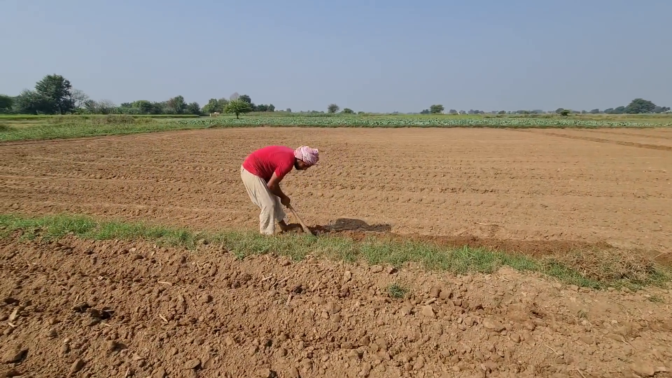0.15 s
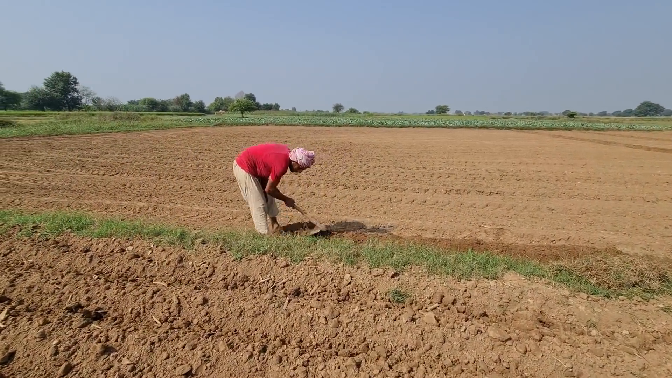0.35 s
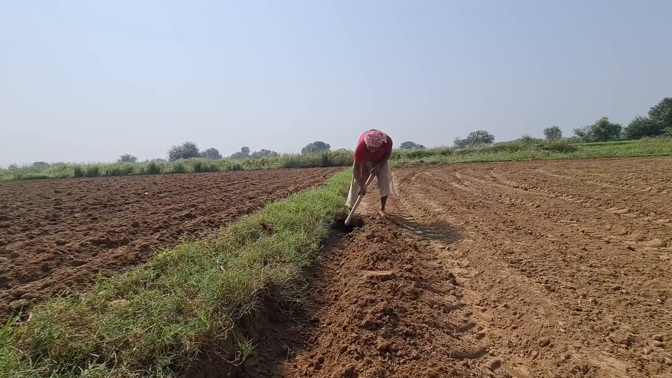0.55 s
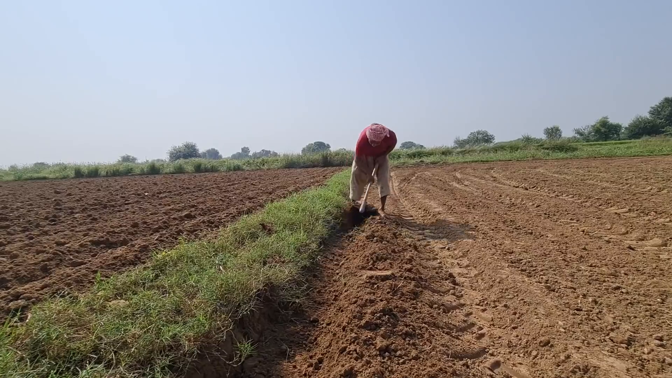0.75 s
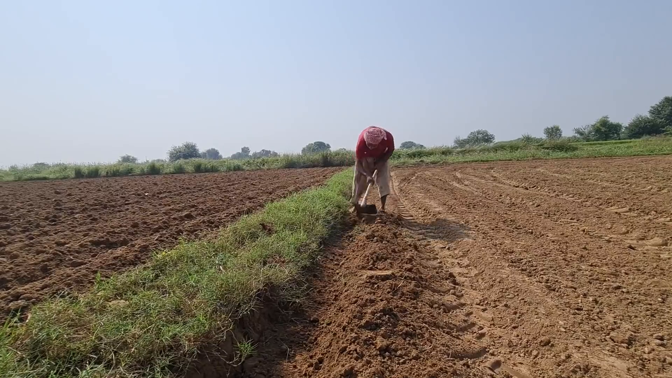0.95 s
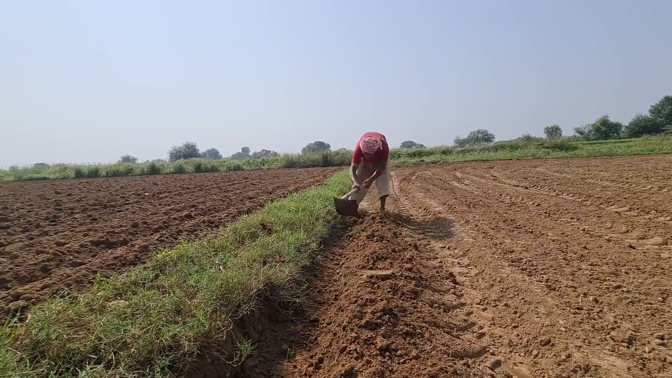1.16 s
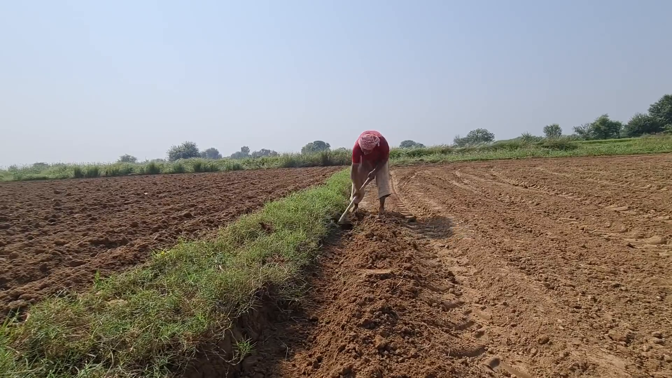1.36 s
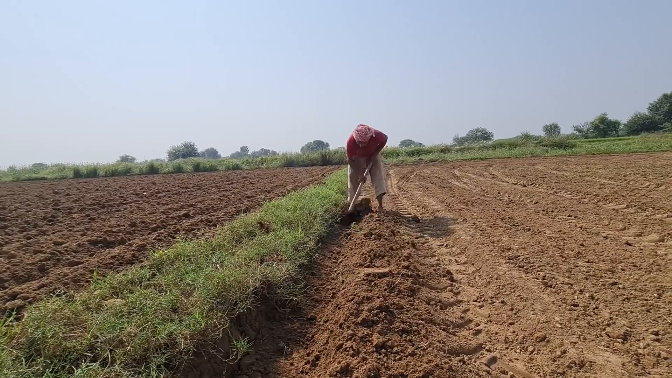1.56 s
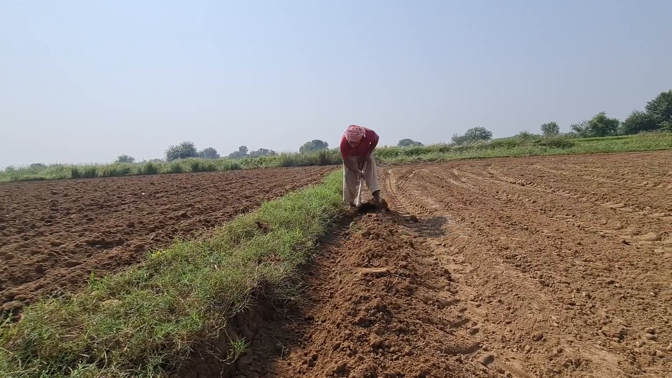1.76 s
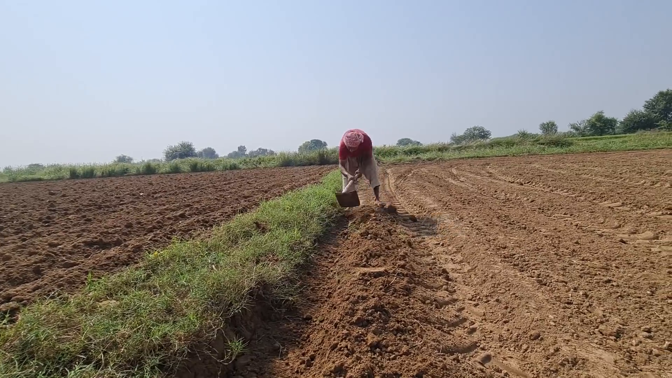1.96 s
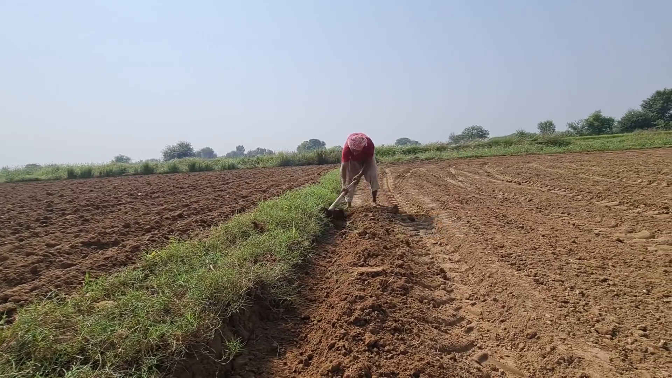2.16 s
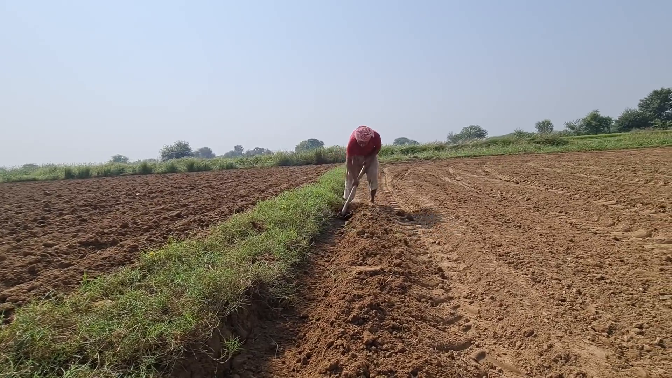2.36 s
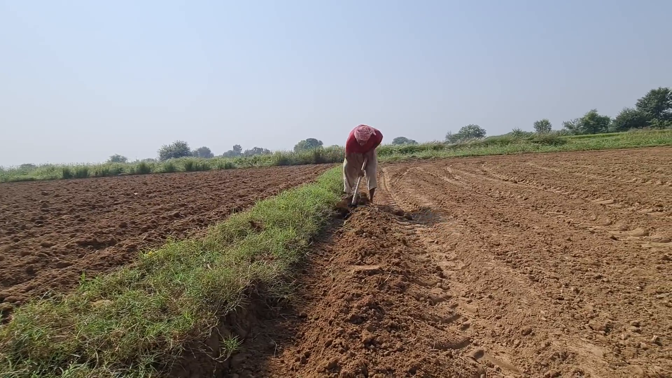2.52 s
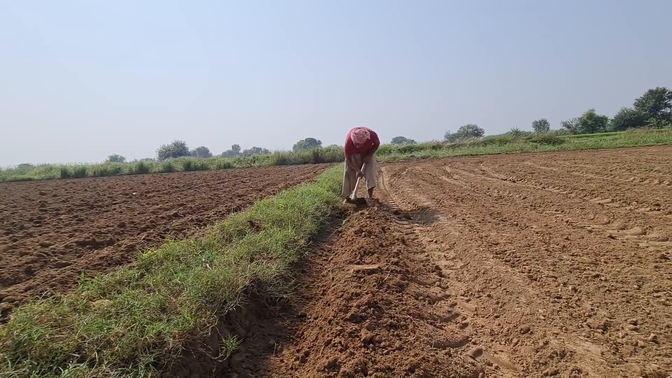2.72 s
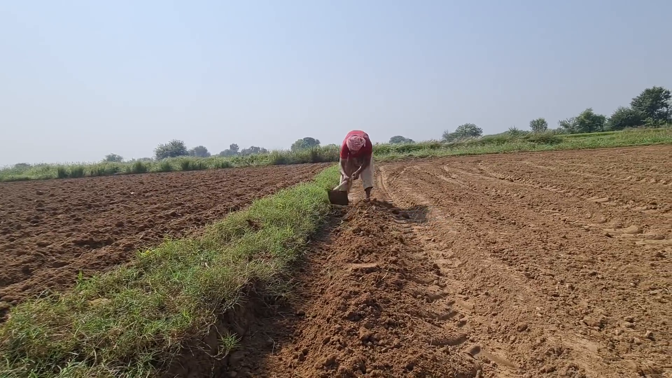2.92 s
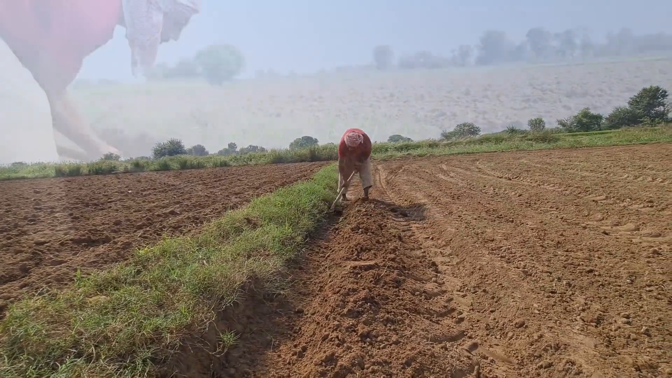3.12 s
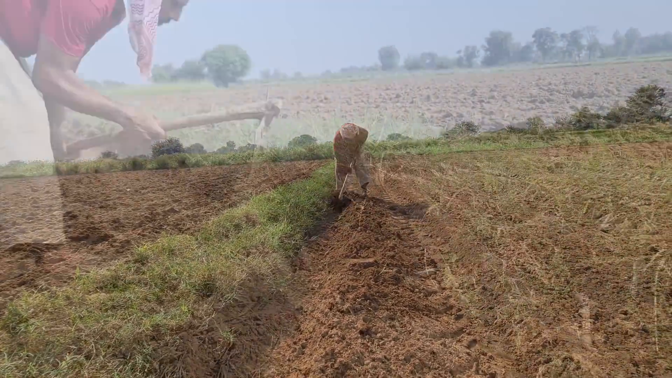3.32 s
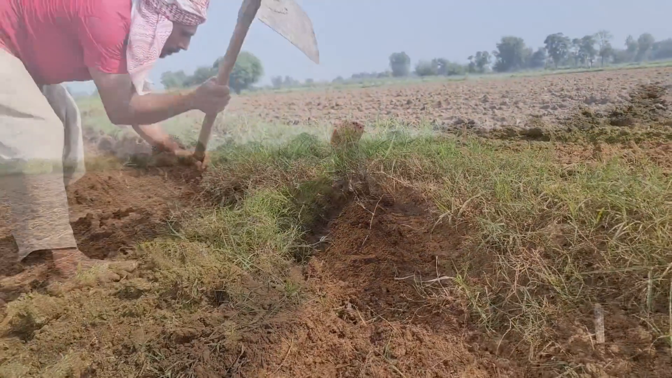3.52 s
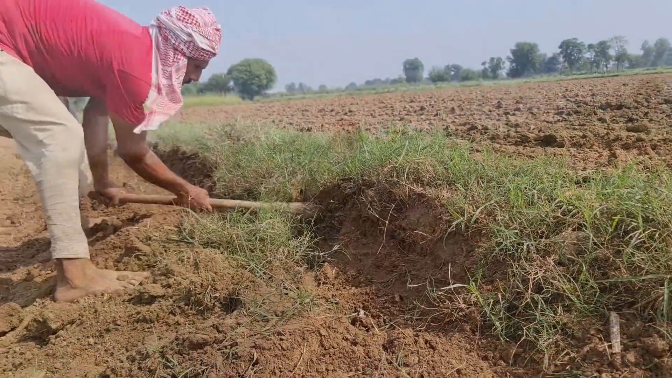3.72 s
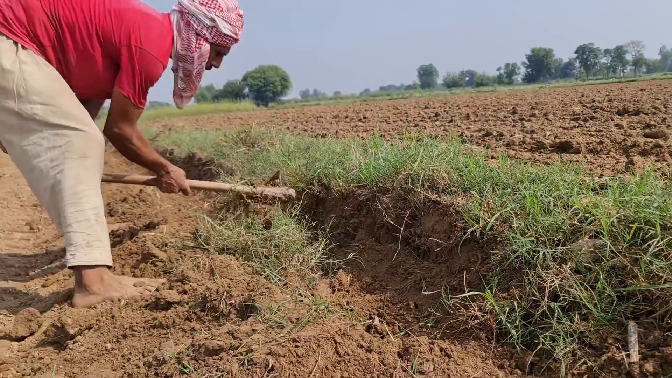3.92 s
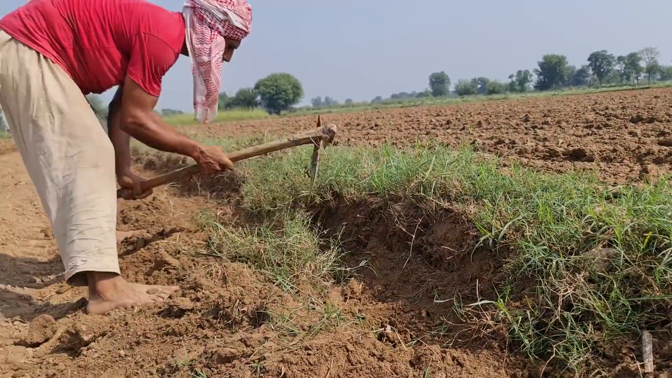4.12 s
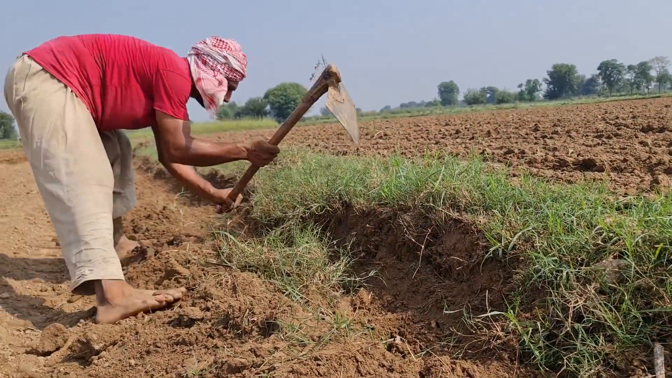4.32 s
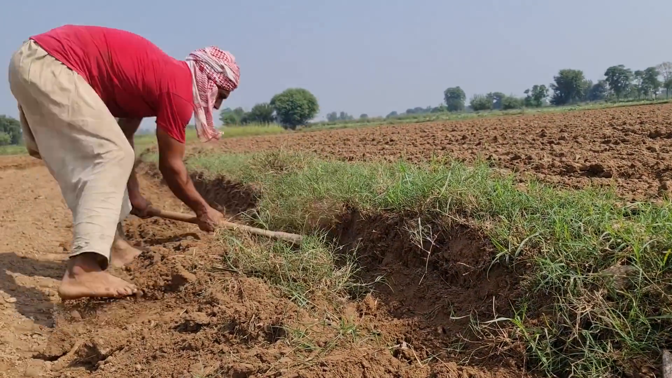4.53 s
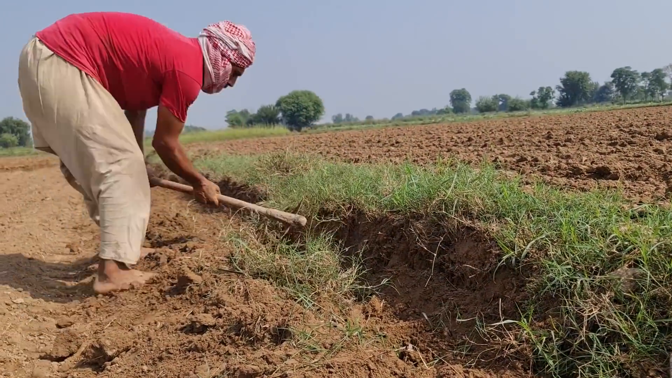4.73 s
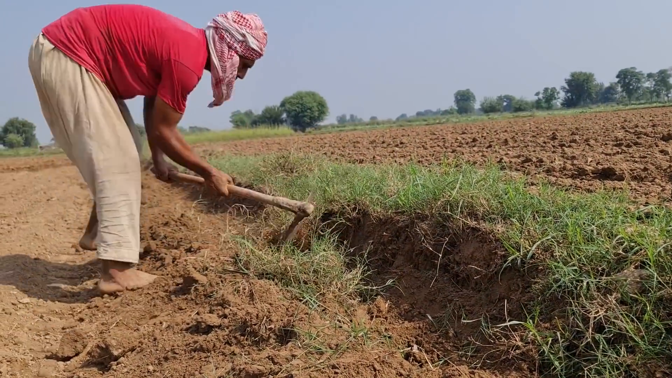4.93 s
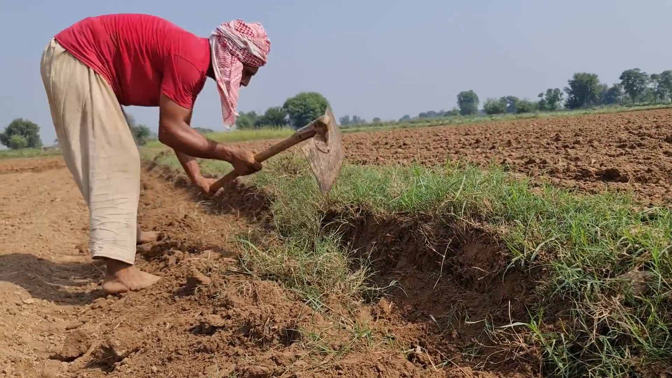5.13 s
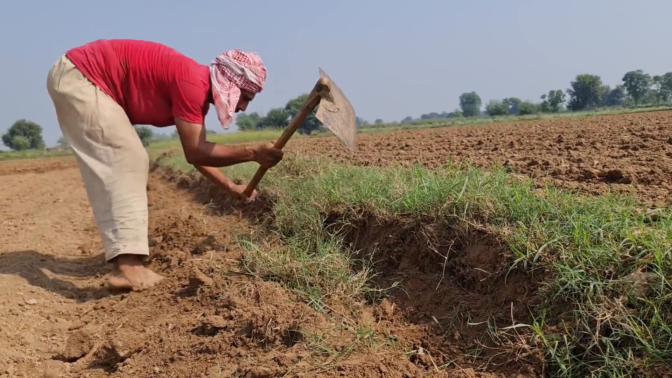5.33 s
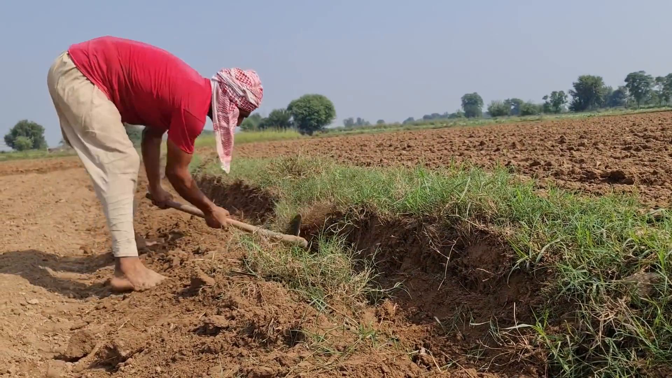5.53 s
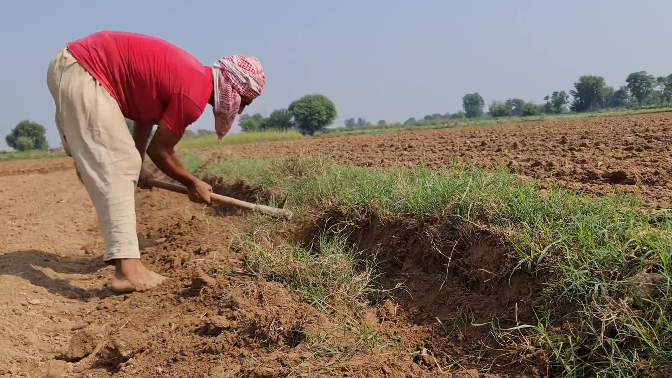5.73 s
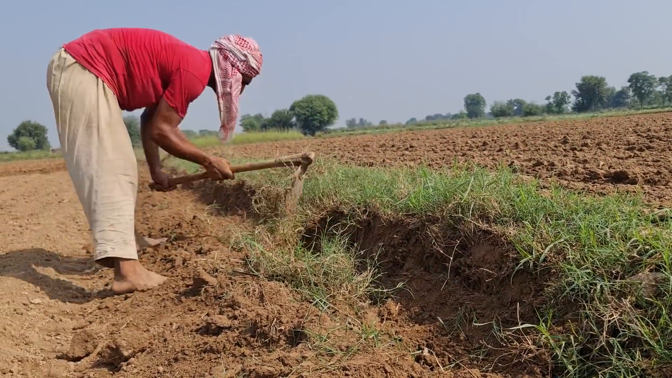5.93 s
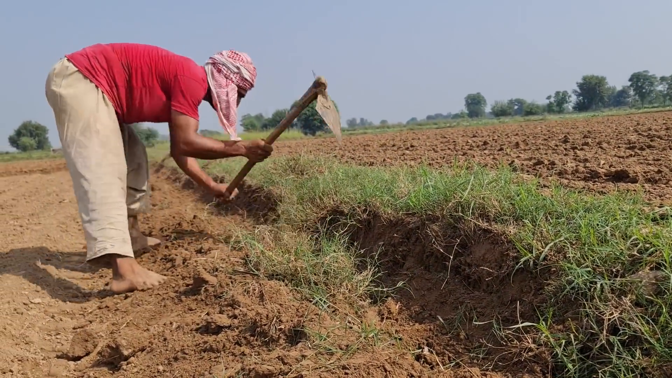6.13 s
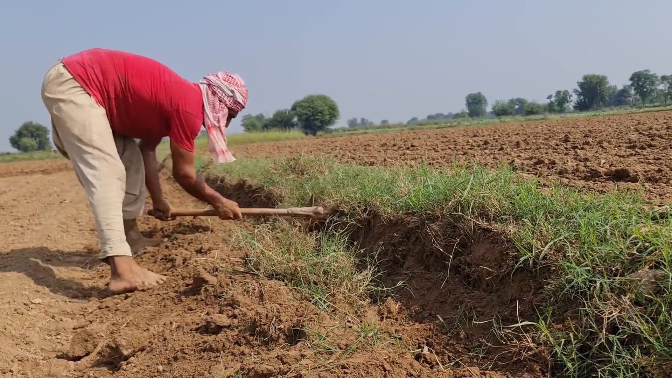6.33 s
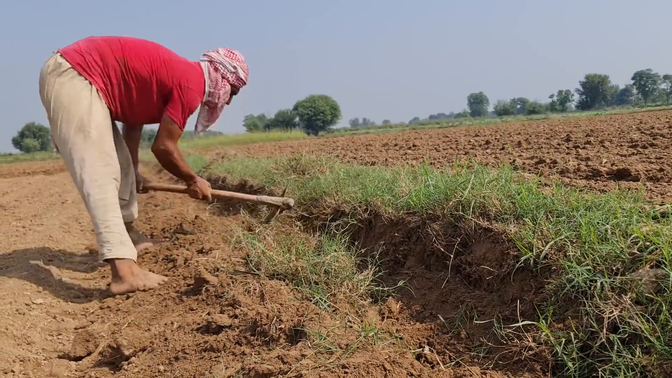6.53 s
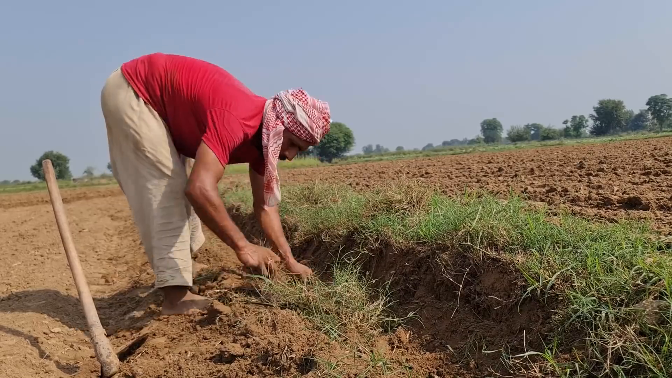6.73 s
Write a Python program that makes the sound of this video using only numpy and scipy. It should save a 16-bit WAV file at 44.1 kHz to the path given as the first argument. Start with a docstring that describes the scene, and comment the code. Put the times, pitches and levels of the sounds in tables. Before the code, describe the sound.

Stereo hand-held outdoor pickup of digging, leaning slightly right and completely dry. Four thin, grassy hoe cuts come from some way off, each with a crisp snap. After them come four close strokes, fuller and harder, with gritty crunch, dull metallic clank, earthy thud and cracking roots. Crumbs trickle and clods patter afterwards. A tiny bird note sounds once late on; a soft deep rumble continues underneath.

```python
"""Open field: a short hoe chops dry, grassy soil, four strokes some way off, then four close by.
Blade strokes are shaped noise: stems tear, grit crunches, the steel rings and the ground thuds.
Bursts of noise make snapping stalks and roots and landing clods; grains of noise make loose soil.
Underneath lie a low rumble and faint air of filtered noise; a bird's two gliding sines sound once."""
import sys
import numpy as np
from scipy import signal
from scipy.fft import rfft, irfft, next_fast_len
from scipy.io import wavfile

SR = 44100
rng = np.random.default_rng(int(sys.argv[2]) if len(sys.argv) > 2 else 0)


def inscribe(sig):
    """Save sig as 16-bit PCM at rate SR to the path in sys.argv[1].

    A 1-D sig is mono; a 2-D sig holds one channel per row.
    Samples are clipped to [-1, 1] before scaling.
    """
    pcm = np.round(np.clip(np.atleast_2d(sig).T, -1, 1) * 32767)
    wavfile.write(sys.argv[1], SR, pcm.astype(np.int16))


N = 302967
TIME_S = np.arange(N) / SR

# All table levels are relative: layer gains and filters follow.
# Hoe strokes; each layer scales swell_db and t60_s:
# bite_s, cutting_s (before the bite), swell_db, t60_s, grass_db, grit_db, ring_db, thud_db, root_snap_db
CHOPS = [ (0.5402, .021, 11.5, 0.2, -44, -58, -61, -45, -28),
         (1.443, 0.035, 4, 0.2, -50, -59, -62, -52.5, -46),
         (2.308, 0.066, 8.5, .24, -49.5, -60, -67, -50.5, -62),
         (3.1938, 0.039, 14, .25, -50, -62, -61.5, -50, -38),
         (3.7614, 0.015, 18, .11, -42, -27.5, -23.5, -37, -25.5),
         (4.560, 0.029, 8, .14, -42.5, -32, -30, -37.5, -34),
         (5.554, .027, 20.5, 0.17, -40.5, -33, -31, -45.5, -29),
         (6.368, 0.029, 15.5, .16, -65, -33.5, -38.5, -43.5, -47)]
# Clods and small stones landing: start_s, level_db, t60_s, dull_above_hz, hop_db (re first landing)
CLODS = [ (0.090, -58.5, 0.046, 1100, -16), (0.44, -49.5, .008, 4400, -30), (0.994, -45, 0.029, 680, -12),
         (3.012, -49, .06, 3600, -14), (3.270, -54, 0.036, 3100, -20), (4.732, -36.5, 0.029, 6440, -17),
         (4.850, -57.5, 0.056, 500, -13), (5.678, -59, .018, 4900, -20), (5.715, -48, 0.028, 7000, -17),
         (6.414, -39, .018, 5000, -8), (6.456, -41, 0.028, 2180, -3.5), (6.467, -45.5, 0.021, 4500, -25),
         (6.738, -55, .02, 7000, -2)]
# Loose soil sliding as the blade is drawn back: middle_s, level_db
SLIDES = [(0.387, -70), (0.948, -65.5), (1.826, -63.5), (2.745, -67), (3.621, -68.5), (4.83, -64.5),
          (5.984, -64.5)]
# Loose soil spilling over the ground: middle_s, half_length_s, level_db
SPILLS = [(0.01, .025, -63.5), (3.028, 0.022, -58.5), (4.003, 0.036, -73), (4.775, 0.011, -60)]
# Bent stalks springing back: start_s
SPRING_STARTS = [0.496, 0.684, 0.722, 4.393, 6.761]
# Bird notes: middle_s, top_pitch_hz, level_db
BIRD_NOTES = [(5.335, 3270, -66.5), (5.368, 3180, -68)]
# Resonances of blade and handle, damped by the soil: pitch_hz, width_hz, level_db
HOE_MODES = [(352, 48, -5.5), (480, 61, -1), (589, 48, 1), (733.4, 52, 8), (881, 55, 2.5), (1084, 50, -2),
             (1289, 90, 0.5), (1477, 90, 3), (1887, 94, -2), (2010, 74, -7.5), (2210, 42, -11.5),
             (3040, 140, -15.5), (3630, 61, -4.5), (3860, 34, -17.5)]
# Narrow treble colours of strokes and slides, as heard at the hand-held microphone:
# pitch_hz, width_hz, level_db
TREBLE_COLOURS = [(3564, 51, -4), (4140, 187, -1.5), (5270, 77, 1), (5940, 100, 4.5), (6450, 163, 3),
                  (7050, 48, 3.5), (7680, 112.7, -15.5), (8260, 76, -6.5)]
# Spectrum of stems and stalks: pitch_hz, level_db (per Hz)
GRASS_SPECTRUM = [(500, -59.5), (2300, -10), (3200, -7.5), (4500, -2), (5700, 1), (6700, 1), (7300, -2),
                  (8300, -18.5), (10500, -16.5), (16000, -21.5)]
# Spectrum of crunching grit: pitch_hz, level_db (per Hz)
GRIT_SPECTRUM = [(120, -7), (350, -17.5), (1000, -4), (1500, 0.5), (2500, -4), (3200, -0.5), (4500, -4),
                 (7000, -2.5), (7700, -9), (9200, -17), (16000, -15.5)]
# Spectrum of the ground's thud: pitch_hz, level_db (per Hz)
THUD_SPECTRUM = [(40, -30), (100, 0.5), (150, 3), (205, 1), (270, -2), (360, -3.5), (520, -14), (1000, -18),
                 (3000, -48)]
# Spectrum of shattering clods: pitch_hz, level_db (per Hz)
CLOD_SPECTRUM = [(80, -17), (200, -6), (420, 2.5), (600, -6.5), (900, -3.5), (1500, -2), (2500, -8),
                 (3500, -6), (7000, -5), (9000, -18.5), (16000, -12.5)]
# Spectrum of the low rumble: pitch_hz, level_db (per Hz)
RUMBLE_SPECTRUM = [(11, -49.5), (18, -35.5), (21, -36.5), (41, -6), (70, 0), (85, -3), (129, -16.5),
                   (151, -24), (184, -29), (209, -33.5), (293, -44.5), (400, -57), (520, -64.5),
                   (880, -120)]
# Spectrum of the field air: pitch_hz, level_db (per Hz)
AIR_SPECTRUM = [(200, -6.5), (350, 0.5), (550, -5), (750, -4.5), (980, -11), (1300, -1), (1580, 0.5),
                (2050, -9), (3000, -10.5), (5300, -14), (7100, -8), (7800, -13.5), (9300, -39),
                (12500, -18), (15000, -16.5)]
# Response of the left microphone port: pitch_hz, level_db
LEFT_PORT = [(3000, 0), (5400, 0), (6100, -2), (6700, -3.5), (7750, 4.5), (8300, 1.5), (9500, -2),
             (13000, -1)]
# Response of the right microphone port: pitch_hz, level_db
RIGHT_PORT = [(3000, 0), (4800, 0), (6000, 0), (6900, 2), (7500, -4.5), (8300, 0), (10000, 1.5), (13000, 0)]

RUMBLE_DB, AIR_DB = -50, -72
NOTE_HALF_S, NOTE_SAG_HZ = 0.0077, 30
SLIDE_HALF_S, SPILL_DULL_HZ = 0.049, 3240
# Clod broken off by each stroke: delay after the bite, level re grit, decay, treble limit, hop re landing
BREAK_AFTER_S, BREAK_DB, BREAK_T60_S, BREAK_DULL_HZ, BREAK_HOP_DB = 0.023, -2.5, 0.019, 2200, -14.5
HOP_S = 0.019           # from landing to second landing
SNAP_HZ, SNAP_WIDTH_HZ, SNAP_T60_S = 6480, 700, 0.013
FIRST_STALK_DB = -6     # re grass level of the stroke
SPRING_DB = -60
# Short reflection at the microphone: lags (left, right) during far and close strokes, level
FAR_LAGS_S, CLOSE_LAGS_S, REFLECTION_DB = (0.0025, 0.00169), (0.00141, 0.0021), -13
CLOSE_FROM_S = 3.55     # listener beside the hoe from here on
CUTOFF_HZ = 15900


def from_db(db):
    """Decibels to gain."""
    return 10 ** (np.asarray(db) / 20)


def rms_one(x):
    """Scale to unit power."""
    return x / np.sqrt(np.mean(x ** 2) + 1e-20)


def colour(x, spectrum):
    """Causal minimum-phase filter that follows a spectrum and keeps the power of white noise."""
    size = next_fast_len(N + SR // 2, True) // 2 * 2
    hz, db = np.transpose(sorted(spectrum))
    grid_hz = np.maximum(np.arange(size // 2 + 1) * SR / size, 1)
    gain = rms_one(from_db(np.interp(np.log(grid_hz), np.log(hz), db)))
    cepstrum = irfft(np.log(gain))
    # fold the cepstrum onto positive time: minimum phase
    cepstrum[1:size // 2] *= 2
    cepstrum[size // 2 + 1:] = 0
    return irfft(rfft(x, size) * np.exp(rfft(cepstrum)))[..., :N]


def dulled(x, hz):
    """Soft soil swallows the treble: second-order low-pass."""
    low_pass = signal.butter(2, min(hz, SR / 3), fs=SR, output="sos")
    return signal.sosfilt(low_pass, x)


def resonate(drive, modes):
    """Parallel two-pole resonances; keeps the power of white noise."""
    out, power = 0, 0
    for k, (hz, width_hz, db) in enumerate(modes):
        r = np.exp(-np.pi * width_hz / SR)
        zeros = np.array([1, 0, -1]) * (1 - r * r) / 2
        poles = [1, -2 * r * np.cos(2 * np.pi * hz / SR), r * r]
        mode = signal.lfilter(zeros, poles, drive)
        out = out + (-1) ** k * from_db(db) * mode
        power += from_db(db) ** 2 * (1 - r)
    return out / np.sqrt(power)


def pan(x, right_db):
    """Level difference that leans a sound to the right."""
    return x * from_db(right_db * np.array([[-0.5], [0.5]]))


def noise(likeness):
    """White noise in two partly alike channels."""
    mid, side = rng.standard_normal((2, N))
    alike = np.clip(likeness, -1, 1)
    signs = np.array([[1], [-1]])
    return np.sqrt((1 + alike) / 2) * mid + np.sqrt((1 - alike) / 2) * side * signs


def grains(per_s, spread_db, likeness):
    """Tiny fractures of uneven size at random moments, in both channels."""
    born = rng.random(N) < per_s / SR
    sizes = from_db(spread_db * np.minimum(rng.exponential(1, N), 4))
    return rms_one(born * sizes * noise(likeness))


def crumbling(depth_db, clump_s):
    """Soil gives way in fits: gain wanders between random values clump_s x 0.5 to 2 apart."""
    knots_s = np.cumsum(rng.uniform(0.5, 2, N // 20)) * max(clump_s, 0.001)
    fits = np.interp(TIME_S, knots_s, rng.uniform(-1.25, 1, len(knots_s)))
    return rms_one(from_db(depth_db * fits))


def crunch(drive, spectrum, depth_db, clump_s):
    """Three coarser bands each come in fits of their own; the finest remainder does not."""
    rest, out = colour(drive, spectrum), 0
    for hz in (1600, 3600, 7600):
        low_pass = signal.butter(2, hz, fs=SR, output="sos")
        coarser = signal.sosfiltfilt(low_pass, rest)
        out = out + coarser * crumbling(depth_db, clump_s)
        rest = rest - coarser
    return out + rest


def treble_grains(per_s, spread_db):
    """Narrow treble colours as heard at the hand-held microphone; each has its own train of grains."""
    out = 0
    for hz, width_hz, db in TREBLE_COLOURS:
        train = grains(per_s, spread_db, likeness=0.37)
        out = out + from_db(db) * resonate(train, [(hz, width_hz, 0)])
    return rms_one(out)


def burst(s, db, t60_s):
    """Sudden start, exponential decay."""
    return (TIME_S >= s) * from_db(db - 60 * np.clip((TIME_S - s) / t60_s, 0, 3))


def swell(s, half_s):
    """Gaussian rise and fall about one moment."""
    return np.exp(-0.5 * np.minimum(((TIME_S - s) / half_s) ** 2, 100))


def stroke_force(levels_db, late_s, hold_s, steeper, fade_scale, touch_db=30):
    """Each stroke swells from first touch to deepest bite, holds briefly and dies as the blade stops."""
    out = np.zeros(N)
    for (bite_s, cutting_s, swell_db, t60_s, *_), level_db in zip(CHOPS, levels_db):
        t = TIME_S - bite_s - late_s
        rise_db = steeper * swell_db * np.minimum(t, 0) / cutting_s
        first_touch_db = touch_db * np.minimum(t / cutting_s + 1, 0)  # slow strokes brush in slowly
        fade_db = -60 * np.maximum(t - hold_s, 0) / (t60_s * fade_scale)
        out += from_db(np.maximum(level_db + rise_db + first_touch_db + fade_db, -200))
    return out


def field():
    """Rumble reaches both ears nearly alike; faint air is diffuse."""
    rumble = from_db(RUMBLE_DB) * colour(noise(likeness=0.93), RUMBLE_SPECTRUM)
    air = from_db(AIR_DB) * colour(noise(likeness=0.0069), AIR_SPECTRUM)
    return pan(rumble, right_db=2.2) + air


def bird():
    """Thin, far whistle of two short notes, each a small arch in pitch."""
    out = 0
    for s, top_hz, db in BIRD_NOTES:
        hz = top_hz - NOTE_SAG_HZ * np.minimum(((TIME_S - s) / NOTE_HALF_S) ** 2, 9)
        whistle = np.sin(2 * np.pi * np.cumsum(hz) / SR)
        out = out + from_db(db) * swell(s, NOTE_HALF_S) * whistle
    return out


def loose_soil():
    """Crumbs trickle after each stroke, spill now and then, and slide as the blade is drawn back."""
    trickle = sum(burst(s, grit_db - 33, t60_s=1.1) for s, _, _, _, _, grit_db, *_ in CHOPS)
    spill = sum(from_db(db) * swell(s, half_s) for s, half_s, db in SPILLS)
    slide = sum(from_db(db) * swell(s, SLIDE_HALF_S) for s, db in SLIDES)
    crumb_grains = grains(per_s=3600, spread_db=0.5, likeness=0.39)
    crumbs = crunch(crumb_grains, GRIT_SPECTRUM, depth_db=7.0, clump_s=0.0079)
    on_blade = resonate(grains(per_s=400, spread_db=3.5, likeness=0.4), HOE_MODES)
    rustle = colour(grains(per_s=3000, spread_db=2.0, likeness=0.5), GRASS_SPECTRUM)
    treble = treble_grains(per_s=250, spread_db=2.5)
    trickling = trickle * (crumbs + from_db(-6.5) * on_blade)
    spilling = spill * (dulled(crumbs, SPILL_DULL_HZ) + from_db(-5) * on_blade)
    sliding = slide * (from_db(-9) * rustle + from_db(-5.5) * treble + from_db(-17.5) * on_blade)
    return trickling + spilling + sliding


def clods():
    """A clod shatters as it lands, hops once and jars the blade; each has its own treble limit."""
    broken_off = [(s + BREAK_AFTER_S, grit_db + BREAK_DB, BREAK_T60_S, BREAK_DULL_HZ, BREAK_HOP_DB)
                  for s, _, _, _, _, grit_db, *_ in CHOPS]
    shatter, knocks = noise(likeness=0.54), 0
    for s, db, t60_s, dull_hz, hop_db in [*broken_off, *CLODS]:
        landings = burst(s, db, t60_s) + burst(s + HOP_S, db + hop_db, t60_s)
        makeup = (1 + 4000 / dull_hz) ** 0.5  # dull knocks pack their energy into a narrow band
        knocks = knocks + makeup * dulled(landings * shatter, dull_hz)
    soil = from_db(1.0) * colour(knocks, CLOD_SPECTRUM)
    return soil + from_db(-15.5) * resonate(knocks, HOE_MODES)


def snaps():
    """A stalk cracks at first touch, a root at the deepest bite; bent stalks spring back at set moments."""
    force = sum(burst(s, SPRING_DB, SNAP_T60_S) for s in SPRING_STARTS)
    for s, cutting_s, _, _, grass_db, *_, root_db in CHOPS:
        stalk = burst(s - cutting_s, grass_db + FIRST_STALK_DB, SNAP_T60_S)
        root = burst(s, root_db, SNAP_T60_S)
        force = force + stalk + root
    cracks = colour(force * noise(likeness=0.59), GRASS_SPECTRUM)
    pitched = resonate(cracks, [(SNAP_HZ, SNAP_WIDTH_HZ, 0)])
    return from_db(-4.5) * cracks + from_db(-10.0) * pitched


def chops():
    """Stems tear, grit crunches on the steel, the blade rings and the ground takes the weight."""
    *_, grass_db, grit_db, ring_db, thud_db, _ = np.transpose(CHOPS)
    fits = crumbling(depth_db=3.5, clump_s=0.002)
    tearing = stroke_force(grass_db, late_s=-0.0014, hold_s=0.00276, steeper=0.84,
                           fade_scale=0.95, touch_db=37.5)
    crushing = stroke_force(grit_db, late_s=0, hold_s=0.00077, steeper=1.26, fade_scale=0.87, touch_db=44)
    striking = stroke_force(ring_db, late_s=-0.00046, hold_s=0.0059, steeper=3.38, fade_scale=0.6)
    pressing = stroke_force(thud_db, late_s=-0.00088, hold_s=0.0063, steeper=2.4, fade_scale=1.0)

    stem_grains = grains(per_s=9600, spread_db=1.0, likeness=0.68)
    stems = crunch(stem_grains, GRASS_SPECTRUM, depth_db=5, clump_s=0.005)
    treble = treble_grains(per_s=570, spread_db=0.5)
    grass = fits * tearing * (from_db(-3) * stems + from_db(-5.5) * treble)

    grit_grains = grains(per_s=16000, spread_db=2.2, likeness=0.57)
    grit = crunch(fits * crushing * grit_grains, GRIT_SPECTRUM, depth_db=0.5, clump_s=0.0044)
    ring = resonate(fits * striking * noise(likeness=0.78), HOE_MODES)
    thud = colour(pressing * noise(likeness=0.89), THUD_SPECTRUM)
    return grass + grit + ring + thud


def near_the_microphone(x):
    """Short reflection off the hands and microphone body ripples the spectrum, differing on each side."""
    reflections = []
    for side, far_s, close_s in zip(x, FAR_LAGS_S, CLOSE_LAGS_S):
        lag_s = np.where(TIME_S < CLOSE_FROM_S, far_s, close_s)
        reflections.append(np.interp(TIME_S - lag_s, TIME_S, side))
    return x + from_db(REFLECTION_DB) * np.array(reflections)


def scene():
    """Digging a little to the right; the open field adds no reverberation."""
    digging = near_the_microphone(chops() + snaps() + clods() + loose_soil())
    return pan(digging, right_db=2.3) + bird() + field()


def record(dry):
    """Microphone ports colour the treble; a steep low-pass cuts the top."""
    heard = np.array([colour(side, port) for side, port in zip(dry, (LEFT_PORT, RIGHT_PORT))])
    low_pass = signal.ellip(10, 0.2, 80, CUTOFF_HZ, fs=SR, output="sos")
    return signal.sosfilt(low_pass, heard)


dry = scene()
out = record(dry)
inscribe(out)
```